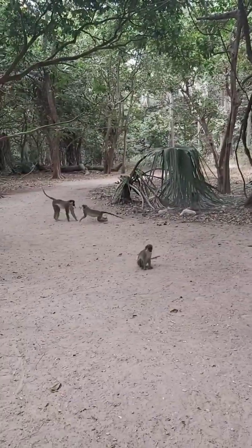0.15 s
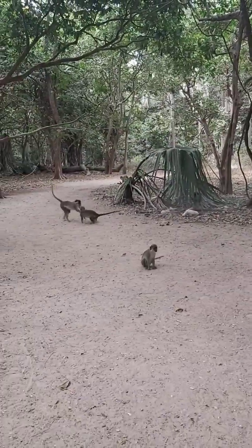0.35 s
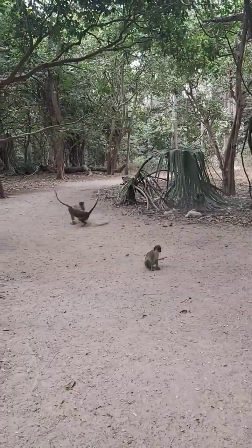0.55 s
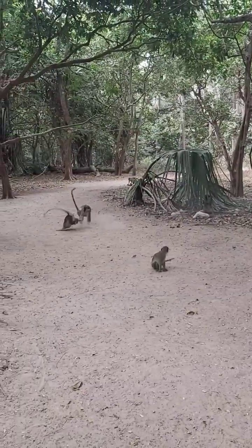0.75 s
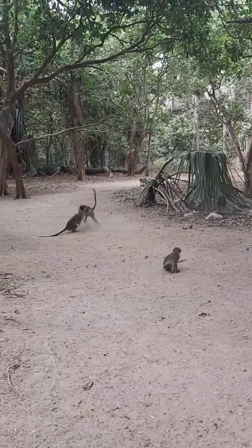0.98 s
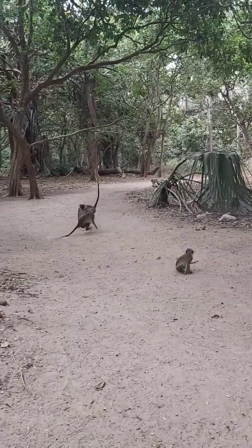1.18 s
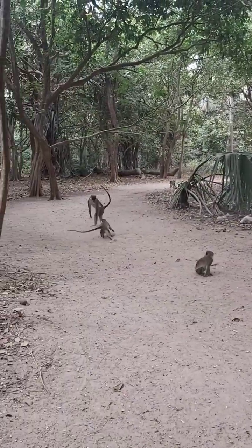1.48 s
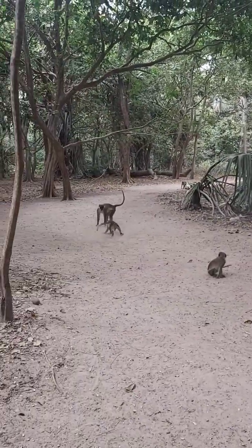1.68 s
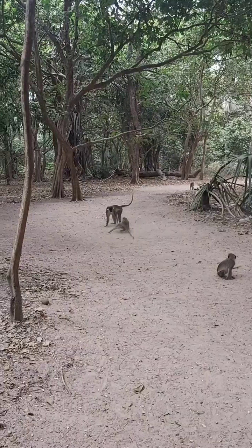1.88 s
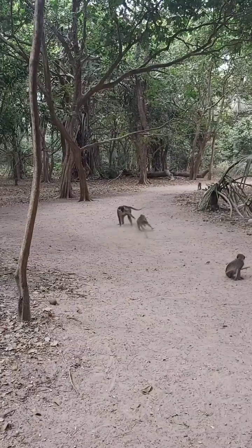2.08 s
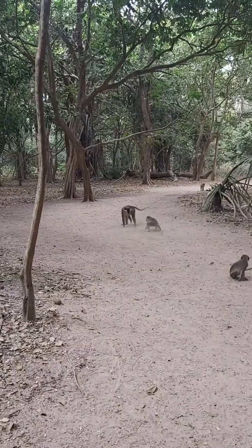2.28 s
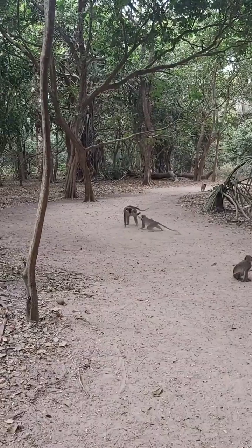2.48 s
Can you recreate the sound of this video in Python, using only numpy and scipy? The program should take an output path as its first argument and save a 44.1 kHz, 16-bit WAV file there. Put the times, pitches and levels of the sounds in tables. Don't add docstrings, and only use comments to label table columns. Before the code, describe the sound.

A monkey's harsh, piercing scream starts faintly near 0.3 s, breaks in at 0.4, climbs, leaps at 0.6 to a rough held shriek, and drops around 1.2-1.35 s into a quick yelp with dull body thuds. A knock lands at 0.75. From 1.8-2.2 s comes a quieter hoarse squawk with crunching leaves, then small scuffs and ticks. Low rumble, faint pulsing insects, short forest tail.

```python
import sys
import numpy as np
from scipy import signal
from scipy.fft import rfft, irfft, next_fast_len
from scipy.io import wavfile
from scipy.ndimage import map_coordinates

SR = 44100
rng = np.random.default_rng(int(sys.argv[2]) if len(sys.argv) > 2 else 0)


def attenuation_scalar(level_db):
    decades = np.asarray(level_db, float) / 20
    return 10 ** decades


def generate_wav(sig):
    pcm = np.round(np.clip(np.atleast_2d(sig).T, -1, 1) * 32767).astype(np.int16)
    wavfile.write(sys.argv[1], SR, pcm)


N = 116865

SCREAM_SLOPES_DB = (6, 20)


def rms_one(x):
    return x / np.sqrt(np.mean(np.abs(x) ** 2) + 1e-20)


def at_hz(points, hz):
    table_hz, values = np.transpose(points)
    return np.interp(np.log(hz), np.log(table_hz), values)


def drift(rate, size):
    r = np.exp(-2 * np.pi * rate / SR)
    settle = 8000
    wander = signal.lfilter([1], [1, -2 * r, r * r], rng.standard_normal(size + settle))
    return rms_one(wander[settle:])


def band(x, low_hz, high_hz):
    return signal.sosfilt(signal.butter(2, [low_hz, high_hz], "band", fs=SR, output="sos"), x)


def pan(db):
    return attenuation_scalar(np.array([[.5], [-.5]]) * db)


def add(out, x, s):
    i = int(s * SR)
    out[..., i:i + x.shape[-1]] += x[..., :N - i]


def distant_air():
    # pitch in Hz, level in dB per Hz.
    air_color = [(30, -20.5), (55, 2.5), (117, -1.5), (384, -18), (1300, -35.5), (2100, -34.5), (3500, -48),
                 (11000, -52)]
    # pitch in Hz, likeness (1 = the same).
    ear_likeness = [(60, 0.97), (240, 0.95), (950, 0.52), (3770, 0), (15000, 0.91)]
    # pitch in Hz, left-right difference in dB.
    air_side = [(60, -1.5), (300, -4), (2000, -3.5), (15000, -8)]
    white = rng.standard_normal((2, 2, N))
    out = 0
    edges = 22 * 2 ** np.arange(0, 9.9, .5)
    for k, (low, high) in enumerate(zip(edges, edges[1:])):
        mid, side = band(white[k % 2], low, high)
        hz = np.sqrt(low * high)
        alike = np.clip(at_hz(ear_likeness, hz), -1, 1)
        flicker_db = 2.0 * drift(2.4, N)
        gain = attenuation_scalar(at_hz(air_color, hz) + flicker_db) * pan(at_hz(air_side, hz))
        out = out + gain * (np.sqrt(1 + alike) * mid + np.sqrt(1 - alike) * side * [[1], [-1]])
    return attenuation_scalar(-39) * rms_one(out)


def insects():
    period_s, peak_s = 0.766, .22
    t = np.arange(N) / SR
    swell_db = 11 * np.cos(2 * np.pi * (t - peak_s) / period_s)
    swelling = rms_one(band(rng.standard_normal((2, N)), 6200, 7000))
    steady = rms_one(band(rng.standard_normal((2, N)), 7230, 8000))
    swelling = attenuation_scalar(-70.5 + swell_db + 1.0 * drift(23, N)) * swelling
    return swelling + attenuation_scalar(-67 + 1.9 * drift(2.6, N)) * steady


def scuffs():
    # start in seconds, peak level in dB, left-right difference in dB.
    steps = [(.06, -68, 10), (1.733, -52, 13), (1.776, -50, -8), (1.9244, -54, 21), (1.99, -44, 3),
             (2.052, -35, -7.5), (2.2214, -46.5, -7), (2.2827, -56, -24), (2.326, -46.5, -22),
             (2.3522, -50.5, -22), (2.4414, -51, -30), (2.452, -43, -10)]
    # start in seconds, length in seconds, level in dB, left-right difference in dB.
    drags = [
        (0.0, 0.23, -57, 1.5),
        (0.34, 0.83, -49, -3),
        (1.732, 0.2, -69.5, 15),
        (1.864, 0.41, -47.5, 0),
        (2.228, 0.086, -69, -22),
        (2.352, 0.052, -70, -12),
        (2.405, 0.15, -64, -16),
        (2.505, 0.21, -71.5, 10),
    ]
    # pitch in Hz, level in dB per Hz.
    leaf_color = [(800, 31.5), (2000, 17.5), (3500, 21.5), (6500, 20), (9000, 9.5), (11000, 18.5),
                  (13500, 5), (16000, 10.5)]
    fade_s, grains_per_s = 0.036, 9200
    strength = np.zeros((2, N))
    t = np.arange(SR // 4) / SR
    for s, db, side_db in steps:
        add(strength, attenuation_scalar(db - 5.5 - 60 * t / fade_s) * pan(side_db), s)
    for s, length, db, side_db in drags:
        add(strength, attenuation_scalar(db) * np.hanning(int(length * SR)) ** .5 * pan(side_db), s)
    grains = (rng.random((2, N)) < grains_per_s / SR) * rng.standard_normal((2, N))
    grains = grains * attenuation_scalar(2.5 * np.minimum(rng.exponential(1, (2, N)), 3))
    hz = np.arange(N // 2 + 1) * SR / N + 1
    leaves = irfft(rfft(grains) * attenuation_scalar(at_hz(leaf_color, hz)) * hz / (hz + 2000), N)
    return strength * rms_one(leaves)


def knocks():
    # start in seconds, level in dB, pitch in Hz, time to fall by 60 dB in seconds,
    # left-right difference in dB.
    hits = [(.058, -62, 2050, 0.068, -14), (0.063, -58, 5450, 0.067, -2), (.063, -59, 2700, .03, -2),
            (0.7475, -34, 2190, 0.006, -13), (0.749, -17, 510, 0.0011, -12),
            (0.7531, -24, 577, 0.0062, -1.5), (0.752, -44, 2160, 0.024, -7),
            (2.328, -42.5, 1800, 0.011, -13), (2.326, -53, 3620, 0.022, -11),
            (2.507, -47, 1860, 0.0073, -15)]
    out = np.zeros((2, N))
    t = np.arange(SR // 8) / SR
    for s, db, hz, fade_s, side_db in hits:
        ring = np.sin(2 * np.pi * hz * t) * 2
        add(out, attenuation_scalar(db - 60 * t / fade_s) * ring * pan(side_db), s)
    return out


def thuds():
    # start in seconds, level in dB.
    landings = [
        (0.891, -43),
        (1.322, -38),
        (1.344, -39.5),
    ]
    out = np.zeros((2, N))
    t = np.arange(SR // 8) / SR
    for s, db in landings:
        burst = rng.standard_normal(len(t)) * attenuation_scalar(db + 13.5 - 60 * t / 0.16)
        add(out, band(burst, 200, 660) * pan(-1.6), s)
    return out


def whistles():
    # start in seconds, length in seconds, pitch in Hz, end pitch in Hz, level in dB.
    glides = [(.635, .025, 10900, 11400, -41), (.68, .025, 11500, 10500, -41), (.76, .03, 7900, 7700, -42),
              (.845, .03, 12900, 12000, -40), (.88, .03, 8500, 8000, -41), (.995, .03, 10500, 10200, -39),
              (1.03, .04, 9600, 9400, -41), (1.1, .08, 9200, 9500, -38), (1.05, .04, 11700, 11400, -40),
              (1.848, .028, 1800, 2150, -48), (1.93, .035, 2800, 2550, -45), (2.045, .025, 4400, 4500, -44),
              (2.058, .03, 3120, 3080, -36), (2.075, .02, 2750, 2700, -44), (2.105, .03, 2550, 2750, -46),
              (2.115, .045, 3400, 3550, -44)]
    out = np.zeros(N)
    size = int(.12 * SR)
    for s, length, hz, end_hz, db in glides:
        along = np.clip(np.arange(size) / SR / length, 0, 1)
        pitch = hz + (end_hz - hz) * along + .014 * hz * drift(100, size)
        tone = np.sin(2 * np.pi * np.cumsum(pitch) / SR)
        fade = np.abs(np.sin(np.pi * along)) ** .5
        add(out, tone * attenuation_scalar(db + 3 * drift(60, size)) * fade, s)
    return out


def voice(rows, roughness, slopes_db, first_db, size, under=0):
    s, *columns = np.transpose(rows)
    t = s[0] + np.arange(size) / SR
    hz, db, mouth, rough = [np.interp(t, s, c) for c in columns + [roughness]]
    phase = 2 * np.pi * np.cumsum(hz * (1 + .011 * drift(129.6, size))) / SR
    blur = signal.butter(4, .28 * np.median(hz), fs=SR, output="sos")
    sound, power = 0, 1e-12
    for k in np.arange(.5, 16500 / hz.min(), .5):
        octaves = np.log2(k * hz / mouth)
        slope = np.where(octaves < 0, slopes_db[0], -slopes_db[1])
        gain = attenuation_scalar(slope * octaves + first_db * (k == 1)) * (k * hz < 17000)
        a, b = rms_one(signal.sosfilt(blur, rng.standard_normal((2, size))))
        smear = (a * np.sin(k * phase) + b * np.cos(k * phase)) * np.sqrt(.5) * attenuation_scalar(1.7 * drift(12, size))
        if k < 1:
            smear = smear * under * rough
        elif k == 1:
            smear = smear * rough
        clean_db = -2.0 * (k > 1 or under > 0) + 4.5 * drift(40, size)
        clean = np.sqrt(2 * (1 - rough ** .5)) * np.sin(k * phase) * attenuation_scalar(clean_db)
        clean = clean * (k % 1 == 0) * (k * hz < 14200)
        sound = sound + gain * (clean + rough ** .25 * smear)
        power = power + gain ** 2 / 2
    edge = np.clip(np.minimum(t - s[0], s[-1] - t) / .001, 0, 1)
    tremor = attenuation_scalar(db + .6 * drift(21.0, size))
    out = np.zeros(N)
    add(out, sound / np.sqrt(power) * tremor * edge, s[0])
    return out


def scream():
    # time in seconds, pitch in Hz, level in dB, mouth resonance in Hz.
    climb = [
        (.33, 2280, -58.5, 2270),
        (.402, 2367, -60.5, 2360),
        (.404, 2410, -37, 2300),
        (.455, 2382, -44, 2620),
        (.49, 2529, -31.5, 4540),
        (.53, 3112, -38.5, 11600),
        (.56, 3260, -34, 12300),
        (.59, 3815, -31.5, 8100),
        (.615, 4060, -29.5, 12000),
    ]
    shriek = [
        (.615, 4984, -30, 11700),
        (.636, 5026, -24.5, 10500),
        (.7, 4985, -30, 11700),
        (.76, 5150, -33, 12200),
        (.86, 5463, -26, 11100),
        (.91, 5446, -32, 11600),
        (.97, 5528, -28, 10200),
        (1.13, 5434, -30, 11140),
        (1.22, 5290, -30.5, 12200),
    ]
    descent = [
        (1.222, 3307, -36.5, 13300),
        (1.245, 3295, -27.5, 12600),
        (1.275, 2740, -32.5, 10900),
        (1.3, 2137, -34, 9500),
        (1.32, 2056, -35.5, 8100),
        (1.355, 2000, -32, 7500),
    ]
    climb_rough = [1, 1, .55, .8, .9, .55, .3, .55, .9]
    shriek_rough = [.9, .35, .55, 1, .8, .98, .7, .92, 1]
    descent_rough = [.3, .15, .2, .4, .95, 1]
    rise = voice(climb, climb_rough, SCREAM_SLOPES_DB, first_db=1.0, size=15000)
    hold = voice(shriek, shriek_rough, SCREAM_SLOPES_DB, first_db=-1.5, size=29000, under=attenuation_scalar(-6))
    hold = signal.sosfilt(signal.butter(6, 2500, "high", fs=SR, output="sos"), hold)
    fall = voice(descent, descent_rough, SCREAM_SLOPES_DB, first_db=6.0, size=8000)
    return rise + hold + fall


def yelp():
    # time in seconds, pitch in Hz, level in dB, mouth resonance in Hz.
    drop_path = [
        (1.298, 2920, -32, 2900),
        (1.31, 2842, -30.5, 2900),
        (1.326, 2436, -23.5, 2410),
        (1.345, 2029, -24.5, 2130),
        (1.362, 1978, -26.5, 2330),
    ]
    yelp_rough = [.5, .65, .8, .55, .9]
    return voice(drop_path, yelp_rough, SCREAM_SLOPES_DB, first_db=-4.5, size=5000)


def squawk():
    # time in seconds, pitch in Hz, level in dB, mouth resonance in Hz.
    squawk_path = [
        (1.826, 500, -53, 950),
        (1.845, 800, -46, 1700),
        (1.87, 1250, -44, 2800),
        (1.93, 1330, -43, 2800),
        (2.035, 1100, -45, 3100),
        (2.055, 1050, -38, 4000),
        (2.12, 900, -40, 2900),
        (2.16, 950, -40, 3600),
        (2.23, 900, -55, 3300),
    ]
    squawk_rough = [.9] * 9
    return voice(squawk_path, squawk_rough, slopes_db=(15, 21), first_db=3, size=20000)


def forest(x):
    # pitch in Hz, time to fall by 60 dB in seconds.
    tail_time = [(1000, 0.53), (2500, 0.55), (6000, 0.46), (11000, 0.4), (16000, 0.38)]
    # pitch in Hz, level in dB.
    path_color = [(800, 6), (1600, -4.5), (2400, 3), (4000, -1.5), (6000, 1.5), (8000, -1), (11000, 2),
                  (15000, 3)]
    # pitch in Hz, left-right difference in dB.
    voice_side = [(1000, -9), (3000, -2.5), (8000, -2.5), (14000, 2)]
    size = int(.8 * SR)
    t, tail = np.arange(size) / SR, 0
    edges = 150 * 2 ** np.arange(0, 7.1, 1)
    for low, high in zip(edges, edges[1:]):
        dying = attenuation_scalar(-60 * t / at_hz(tail_time, np.sqrt(low * high)))
        scatter = band(rng.standard_normal((2, size)), low, high)
        tail = tail + scatter * dying / np.sqrt(np.sum(dying ** 2))
    tail = tail * (1 - np.exp(-t / .008)) * attenuation_scalar(-1.5)
    lag = 1 + 4 * drift(4, N)
    late = map_coordinates(x, [np.arange(N) - lag], order=3)
    grid = next_fast_len(N + size)
    hz = np.arange(grid // 2 + 1) * SR / grid + 1
    heard = rfft(x, grid) * rfft(tail, grid) + rfft([x, late], grid)
    return irfft(heard * attenuation_scalar(at_hz(path_color, hz)) * pan(at_hz(voice_side, hz)), grid)[:, :N]


def scene():
    background = distant_air() + insects()
    ground = scuffs() + knocks() + thuds()
    cries = scream() + yelp() + squawk() + whistles()
    return background + ground + forest(cries)


def band_limit(x):
    return signal.sosfilt(signal.butter(12, 16520, fs=SR, output="sos"), x)


def record(dry):
    cut = signal.sosfilt(signal.ellip(12, .5, 70, 15650, fs=SR, output="sos"), dry)
    return band_limit(cut)


dry = scene()
out = record(dry)
generate_wav(out)
```